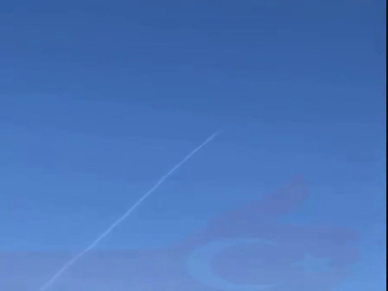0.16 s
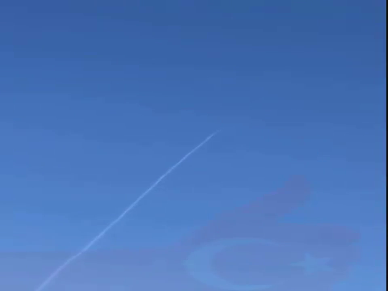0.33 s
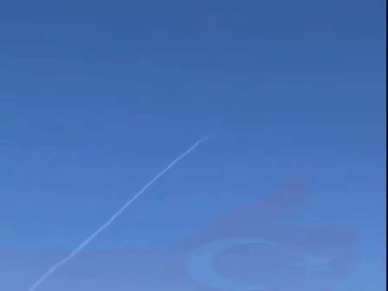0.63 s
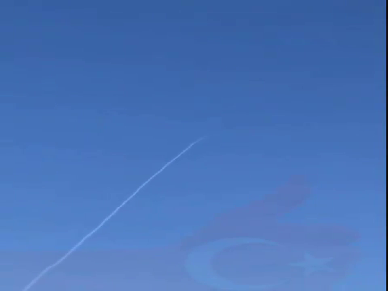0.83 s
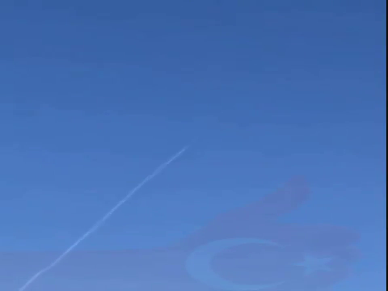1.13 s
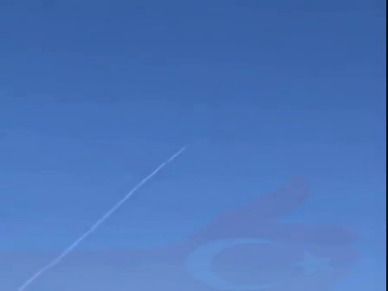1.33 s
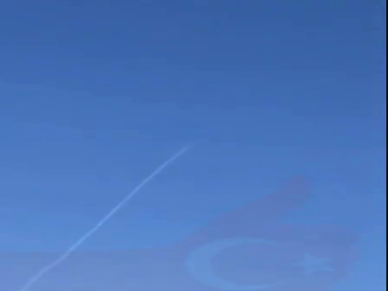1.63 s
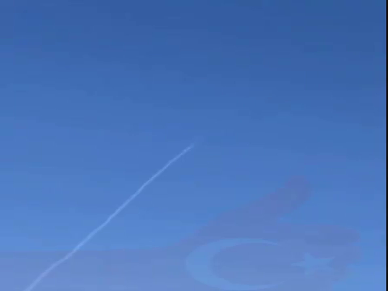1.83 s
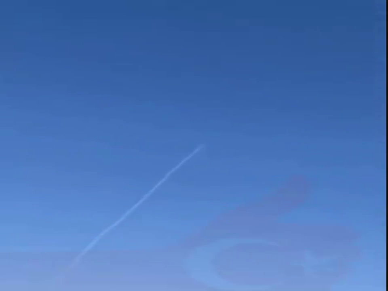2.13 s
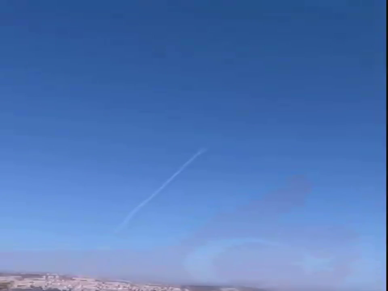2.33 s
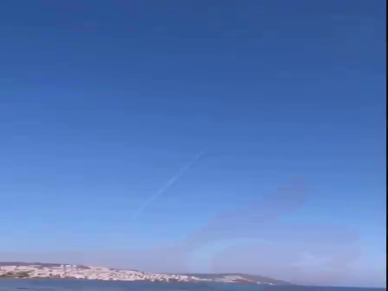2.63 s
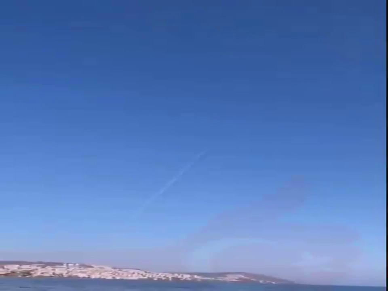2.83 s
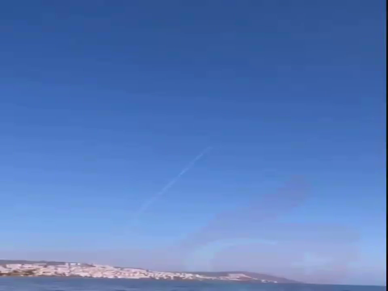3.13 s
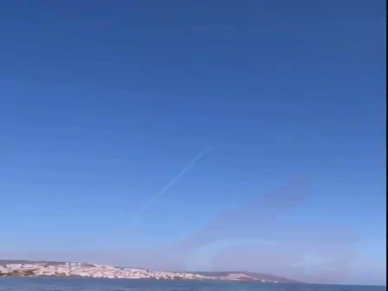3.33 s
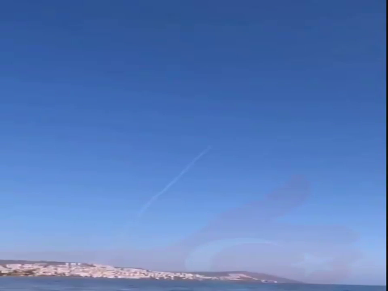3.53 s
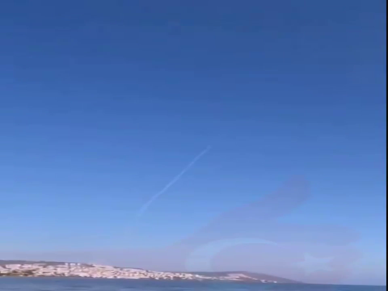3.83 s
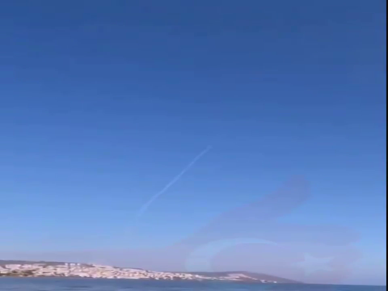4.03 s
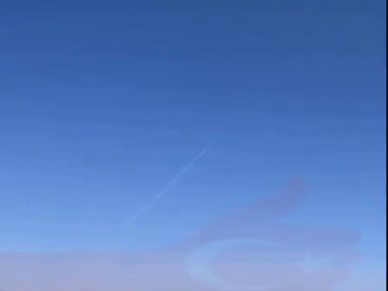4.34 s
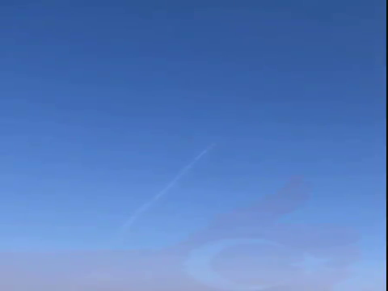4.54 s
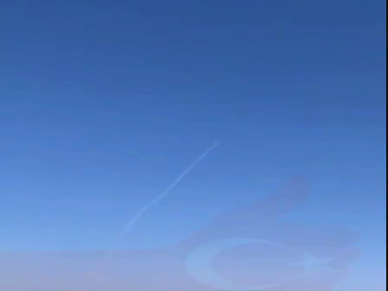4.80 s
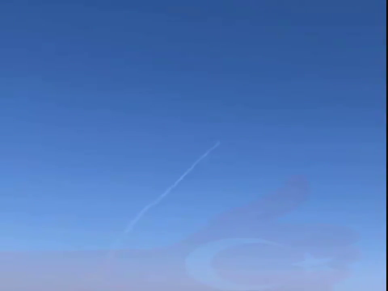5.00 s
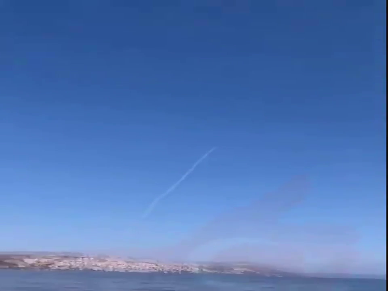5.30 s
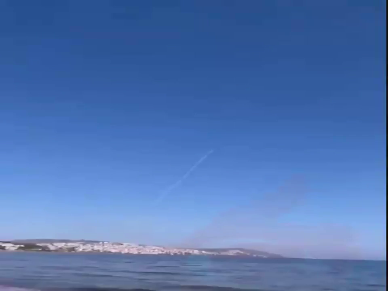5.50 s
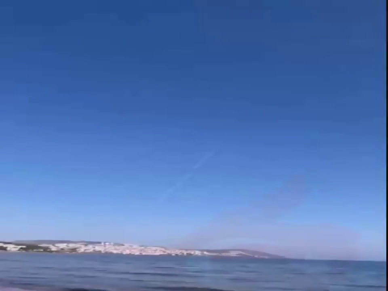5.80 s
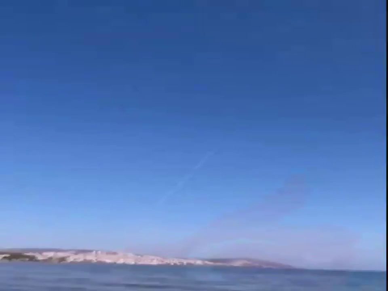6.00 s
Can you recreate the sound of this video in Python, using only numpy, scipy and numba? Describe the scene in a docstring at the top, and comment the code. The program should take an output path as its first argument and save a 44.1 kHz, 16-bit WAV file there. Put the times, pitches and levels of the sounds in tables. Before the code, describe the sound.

Outdoors on a seashore, a phone picks up small waves close by, washing in and fizzing, with a few bubbly plops. Wind bumps the microphone in low soft thuds, mostly in the first second and a half. A fuller wave swells and drains away. Late on, a far rocket's roar arrives suddenly, low, dull and crackling, its bass rumble building to dominate until the end.

```python
"""On a seashore under a far, climbing rocket, close to small waves, with a phone microphone in the wind.
The waves wash in and fizz: coloured noise mixed with ringing bubbles, under rising and falling levels.
Wind buffets the microphone: uneven low noise, with short low wobbles for the stronger eddies.
Then the rocket's sound arrives all at once: a dense train of random shocks, dulled by distance into a roar
and a crackle, with single strong shocks on top and a deep rumble that builds up."""
import sys
import numpy as np
from scipy import signal
from scipy.fft import rfft, irfft
from scipy.io import wavfile
from scipy.ndimage import uniform_filter1d
from numba import njit

SR = 44100
rng = np.random.default_rng(int(sys.argv[2]) if len(sys.argv) > 2 else 0)


def generate_wav(sig):
    """Save sig (samples, or channels by samples) to the path in sys.argv[1] as 16-bit PCM at SR."""
    pcm = np.round(np.clip(np.atleast_2d(sig).T, -1, 1) * 32767).astype(np.int16)
    wavfile.write(sys.argv[1], SR, pcm)


N = 271656
TIME = np.arange(N) / SR   # seconds
ARRIVAL_S = 4.653   # the rocket's sound reaches the shore

# Body of the far rocket's sound. Each row: frequency in Hz, relative density in dB per Hz.
ROAR_SPECTRUM = [(60, -49), (100, -11), (135, 2), (170, 2), (240, -3), (340, -10), (450, -19.5), (700, -37)]
# Its deep part. Each row: frequency in Hz, relative density in dB per Hz.
RUMBLE_SPECTRUM = [(22, -43), (32, -19.5), (48, -18), (65, -2.5), (85, -1.5), (110, 1), (150, -5.5),
                   (260, -27)]
# Its sharper upper part. Each row: frequency in Hz, relative density in dB per Hz.
CRACKLE_SPECTRUM = [(250, -20), (420, 2.5), (550, 4), (750, -4), (1000, -9), (1500, -46), (3000, -51)]
# Loudness of the roar as it reaches the shore. Each row: time in seconds, level in dB.
ROAR_LEVEL = [(4.655, -28), (4.75, -21.5), (4.94, -18.3), (5.0, -15.5), (5.2, -17), (5.37, -13.5),
              (5.54, -12.5), (5.93, -21), (6.16, -22)]


def rocket():
    """The exhaust throws off random shocks; their sound starts abruptly and gains depth as the rumble builds."""
    roar_db, = in_time(ROAR_LEVEL)
    roar_shocks = evened(coloured(clicks(per_s=700, spread_db=1.5), ROAR_SPECTRUM), span_s=0.023)
    roar = from_db(roar_db + 0.75 * drift(18)) * roar_shocks

    # the rumble builds up after the arrival, then holds
    held_db, build_s, rise_db_per_s = -15.5, 0.69, 49
    rumble_db = held_db - rise_db_per_s * np.maximum(ARRIVAL_S + build_s - TIME, 0)
    rumble_shocks = evened(coloured(clicks(per_s=400, spread_db=2), RUMBLE_SPECTRUM), span_s=0.027)
    rumble = from_db(rumble_db) * rumble_shocks

    # the crackle follows the roar, in dB per dB, from its level at the roar's peak
    crackle_peak_db, follow = -31, 1.07
    crackle_db = crackle_peak_db + follow * (roar_db - roar_db.max())
    crackle_shocks = evened(coloured(clicks(per_s=1000, spread_db=2.2), CRACKLE_SPECTRUM), span_s=0.021)
    crackle = from_db(crackle_db) * crackle_shocks

    arrived = np.sin(np.pi / 2 * np.clip((TIME - ARRIVAL_S) / 0.0021, 0, 1)) ** 2
    # the deep bass is left to the rumble, which builds up later
    no_bass = signal.butter(4, 95, "high", fs=SR, output="sos")
    upper = signal.sosfilt(no_bass, arrived * (roar + crackle))
    return upper + arrived * rumble + strong_shocks(length_s=.0011, low_cut_hz=110)


# The strongest shocks from the far rocket. Each row: time of the jump in seconds, peak level in dB before
# the air and the microphone filter it, sharpness of the front as a low-pass corner in Hz.
SHOCKS = [(4.659, -14, 300), (4.742, -13, 260), (4.913, -7, 260), (5.011, -2, 296), (5.138, -7, 220),
          (5.216, -2, 282), (5.395, -10, 870), (5.442, -11, 750), (5.514, -10.5, 1000), (5.557, -13, 850),
          (5.586, -13, 845), (5.667, -14.5, 776), (5.711, -16, 850), (5.725, 0.5, 220), (5.811, -2, 200),
          (5.981, -2, 180)]


def strong_shocks(length_s, low_cut_hz):
    """Each shock is a suck, a steep jump and a decay; the air rounds its front, the microphone thins its bass."""
    out = np.zeros(N)
    for s, db, front_hz in SHOCKS:
        wave = np.sign(TIME - s) * np.exp(-np.minimum(np.abs(TIME - s) / length_s, 20))
        air = signal.butter(4, front_hz, fs=SR, output="sos")
        out += from_db(db) * signal.sosfilt(air, wave)
    microphone = signal.butter(2, low_cut_hz, "high", fs=SR, output="sos")
    return signal.sosfilt(microphone, out)


# Churning of a breaking wave. Each row: frequency in Hz, relative density in dB per Hz.
CHURN_SPECTRUM = [(100, -3), (210, 2.5), (400, 0), (600, -1), (880, 0.5), (1400, -1.5), (2000, -11),
                  (3500, -22.5)]
# Wash running up the shore. Each row: frequency in Hz, relative density in dB per Hz.
WASH_SPECTRUM = [(900, -35.5), (1900, -3), (2700, 0), (3600, -4.5), (4800, -7.5), (7000, -22)]
# Fizzing foam. Each row: frequency in Hz, relative density in dB per Hz.
FOAM_SPECTRUM = [(1500, 7.5), (3500, -18), (5500, 6), (6600, 4.5), (7500, -2), (9500, 1.5), (13500, 1.5)]
# Water draining through the shingle. Each row: frequency in Hz, relative density in dB per Hz.
DRAINING_SPECTRUM = [(2200, -20), (2700, 4), (3100, 3), (3450, -0.5), (3900, -2), (4500, -4), (5200, -34.5)]
# Small waves on the shore. Each row: time of breaking in seconds, wash, churn and foam levels at the crest
# in dB, attack in seconds, hold in seconds, fall of the wash and churn in dB per second.
WAVES = [(0.01, -52.5, -48, -57, 0.34, .1, 27.5), (0.69, -56, -51, -61, .25, .45, 22),
         (1.48, -41, -36, -45.5, 0.78, .86, 26), (3.388, -48.5, -43, -54.3, 0.33, 0.8, 20),
         (4.668, -42.5, -38, -47, 1.16, .62, 15.5)]


def surf():
    """A wave churns as it breaks, washes up the shore and leaves fizzing foam; one drains back audibly."""
    churn_lag_s = 0.064   # the water churns just after the crest spills
    foam_fades_faster = 1.16   # times the fall of the wash
    # powers, starting from the calm sea between waves
    churning, washing, foaming = from_db([-69, -74, -66]) ** 2
    for s, wash_db, churn_db, foam_db, attack_s, hold_s, fall in WAVES:
        churning = churning + surge(s + churn_lag_s, churn_db, attack_s, hold_s, crest_db=3.2, fall_db_per_s=fall)
        washing = washing + surge(s, wash_db, attack_s, hold_s, crest_db=1.8, fall_db_per_s=fall)
        foam_fall = fall * foam_fades_faster
        foaming = foaming + surge(s, foam_db, attack_s, hold_s, crest_db=1.3, fall_db_per_s=foam_fall)
    # the biggest wave drains back through the shingle
    draining = surge(2.64, db=-54, attack_s=0.12, hold_s=0.37, crest_db=1.5, fall_db_per_s=55)
    draining_share = np.clip(draining / washing, 0, .8)   # the wash turns into backwash

    grains = bubbles(per_s=3000, spread_db=3.5, cycles=139, rise=0.0087)   # air whipped into the water
    churn = np.sqrt(churning) * water(CHURN_SPECTRUM, grains, bubble_db=-4.5, flutter_db=0.64)
    wash_power = washing * (1 - draining_share)
    wash = np.sqrt(wash_power) * water(WASH_SPECTRUM, grains, bubble_db=-6.5, flutter_db=0.49)
    backwash = np.sqrt(draining) * water(DRAINING_SPECTRUM, grains, bubble_db=-9, flutter_db=.3)
    foam = np.sqrt(foaming) * water(FOAM_SPECTRUM, grains, bubble_db=-10, flutter_db=0.5)
    return churn + wash + backwash + foam


def surge(start_s, db, attack_s, hold_s, crest_db, fall_db_per_s):
    """Power of a rush of water: it climbs 20 dB in the attack, arches over its crest and dies away."""
    age = TIME - start_s
    climb_db = 20 * np.minimum(age / attack_s, 0)
    arch = np.sin(np.pi * np.clip(age / hold_s, 0, 1) ** 0.78)   # the crest comes early
    fall_db = fall_db_per_s * np.maximum(age - hold_s, 0)
    return from_db(db + climb_db + crest_db * (arch - 1) - fall_db) ** 2


def water(spectrum, grains, bubble_db, flutter_db):
    """Single bubbles stand out of the smooth rush of countless others."""
    rush = rng.standard_normal(N) + from_db(bubble_db) * grains
    return coloured(rush, spectrum) * from_db(flutter_db * drift(15.4))


def bubbles(per_s, spread_db, cycles, rise):
    """Bubbles born at random ring at pitches of their own, small ones more common; 60 dB decay in cycles."""
    when, pitch, strength = rng.random((int(per_s * N / SR), 3)).T
    lowest, highest = np.sqrt(250), np.sqrt(13000)   # roots of Hz
    hz = (lowest + pitch * (highest - lowest)) ** 2
    sizes = hz ** .75 * from_db(spread_db * np.minimum(-np.log(1 - strength), 3.5))
    starts = (when * N).astype(np.int64)
    turns = 2 * np.pi * hz / SR
    decays = np.log(1000) * hz / (cycles * SR)
    out = np.zeros(N)
    add(out, starts, sizes, turns, decays, rise)
    return rms_one(out)


@njit
def add(out, starts, sizes, turns, decays, rise):
    """Add dying sines that rise in pitch; turns are radians and decays nepers per sample."""
    for start, size, turn, decay in zip(starts, sizes, turns, decays):
        for i in range(min(int(4 / decay), len(out) - start)):
            age = i * decay
            out[start + i] += size * np.exp(-age) * np.sin(turn * i * (1 + rise * age))


# Single large bubbles and drips in the shallows. Each row: start in seconds, starting pitch in Hz,
# level in dB before the swell shapes it.
PLOPS = [(.656, 2280, -45), (.946, 2630, -40), (1.128, 1320, -40), (1.674, 301, -24), (3.653, 301, -30.5),
         (3.763, 2800, -38), (4.036, 947, -35), (4.062, 2220, -36), (4.129, 775, -31.5)]


def plops(ring_s, rise_per_s):
    """Large bubbles ring briefly and rise in pitch as they near the surface."""
    out = np.zeros(N)
    for s, hz, db in PLOPS:
        age = np.clip(TIME - s, 0, .15)
        swell = (1 - np.exp(-age * hz)) * np.exp(-age / ring_s)
        cycles = hz * age * (1 + rise_per_s * age)
        out += from_db(db) * swell * np.sin(2 * np.pi * cycles)
    return out


# Steady wind on the microphone. Each row: time in seconds, level in dB.
BREEZE_LEVEL = [(0, -47), (.6, -50), (1.3, -46), (1.9, -44.5), (2.8, -50), (3.8, -48.5), (4.3, -51.5),
                (6.16, -55)]
# Its colour at the microphone. Each row: frequency in Hz, relative density in dB per Hz.
BREEZE_SPECTRUM = [(22, -23), (33, -7.5), (48, -12.5), (65, 2.5), (100, -5.5), (150, 0), (200, -8),
                   (320, -15), (600, -24.5)]


def wind():
    """Lumpy low turbulence with single stronger eddies."""
    breeze_db, = in_time(BREEZE_LEVEL)
    turbulence = evened(coloured(rng.standard_normal(N), BREEZE_SPECTRUM), span_s=0.099)
    breeze = turbulence * from_db(breeze_db + 1.0 * drift(13))
    return breeze + buffets(sag=.35, push_db=-9, push_s=0.0087)


# Eddies hitting the microphone. Each row: middle in seconds, peak level of the wobble in dB,
# pitch at the middle in Hz, half length in seconds.
BUFFETS = [(.042, -35.5, 91, .011), (0.431, -35, 100, .0072), (.472, -27.5, 105, .0077),
           (0.649, -36, 114, 0.018), (.807, -35.5, 65, 0.016), (.834, -35.5, 200.7, .0063),
           (.854, -29, 90, 0.017), (.892, -32.5, 108, .01), (1.066, -27.5, 99, 0.013),
           (1.172, -24, 149.3, 0.0045), (1.199, -23.5, 100, .01), (1.222, -29.5, 125, .014),
           (1.402, -26.5, 91, 0.0084), (1.778, -30, 106, .0056), (2.349, -33, 120, .01),
           (3.838, -32, 121, .01)]


def buffets(sag, push_db, push_s):
    """An eddy rocks the diaphragm briefly, ever more slowly, on top of a slower push and pull."""
    out = np.zeros(N)
    start_phases = rng.uniform(0, 2 * np.pi, len(BUFFETS))
    for (s, db, hz, length), start_phase in zip(BUFFETS, start_phases):
        age = (TIME - s) / length
        swell = np.exp(1 - np.hypot(1, 2.0 * age))
        phase = 2 * np.pi * np.cumsum(hz * (1 - sag * np.tanh(age / 2))) / SR
        passing = (TIME - s - length / 2) / push_s
        push = np.sin(np.pi * passing) * np.exp(-np.minimum(passing ** 2 / 2, 20))
        out += from_db(db) * (swell * np.sin(start_phase + phase) + from_db(push_db) * push)
    return out


def from_db(db):
    """Decibels to gain."""
    return 10 ** (np.asarray(db) / 20)


def rms_one(x):
    """Scale to unit power."""
    return x / np.sqrt(np.mean(x ** 2) + 1e-20)


def in_time(rows):
    """Each column of a curve at every sample."""
    s, *columns = np.transpose(rows)
    return [np.interp(TIME, s, c) for c in columns]


def coloured(x, spectrum):
    """Shape x by a spectrum that falls 24 dB per octave past its ends; unit power."""
    hz, db = np.transpose(spectrum)
    octave = np.log2(np.maximum(np.arange(N // 2 + 1) * SR / N, 1))
    points = np.log2(hz)
    outside = np.abs(octave - np.clip(octave, points[0], points[-1]))
    gain = from_db(np.interp(octave, points, db) - 24 * outside)
    return rms_one(irfft(rfft(x) * gain, N))


def drift(rate_hz):
    """Slow chance with spread 1: noise through two equal low-pass poles, drawn every 40 samples."""
    r = np.exp(-80 * np.pi * rate_hz / SR)
    noise = rng.standard_normal(N // 40 + 2002)
    slow = signal.lfilter([1], [1, -2 * r, r * r], noise)[2000:]   # drop the settling
    return np.interp(np.arange(N) / 40, np.arange(len(slow)), rms_one(slow))


def evened(x, span_s):
    """Keep the fast flutter of x and hold its slower level at 1."""
    size = max(int(span_s * SR), 2)
    power = uniform_filter1d(uniform_filter1d(x * x, size), size)
    return x / np.sqrt(power + 1e-9)


def clicks(per_s, spread_db):
    """Impulses of either sign at random moments, a few much stronger than the rest."""
    strength_db = spread_db * np.minimum(rng.exponential(1, N), 4)
    sizes = from_db(strength_db) * rng.choice([-1, 1], N)
    return sizes * (rng.random(N) < per_s / SR)


def scene():
    """Shore, wind and rocket at one microphone."""
    shore = surf() + plops(ring_s=.007, rise_per_s=2.0)
    return (shore + wind() + rocket())[None]


def record(dry):
    """The phone rounds the peaks, mutes a narrow treble band and cuts the top."""
    rounded = 0.87 * np.tanh(dry / 0.93)
    gap = signal.ellip(5, .3, 34, (7520, 8900), "bandstop", fs=SR, output="sos")   # Hz
    top = signal.ellip(12, .2, 60, 13800, fs=SR, output="sos")   # Hz
    return signal.sosfilt(np.vstack([gap, top]), rounded)


dry = scene()
out = record(dry)
generate_wav(out)
```